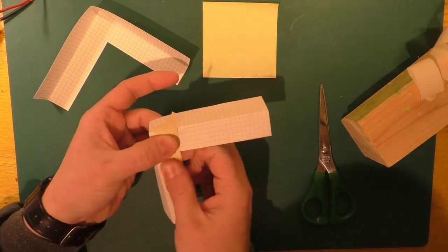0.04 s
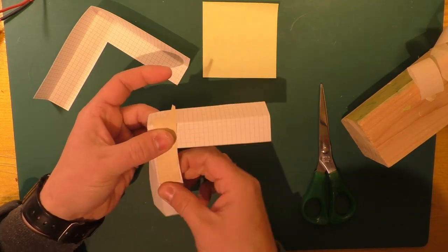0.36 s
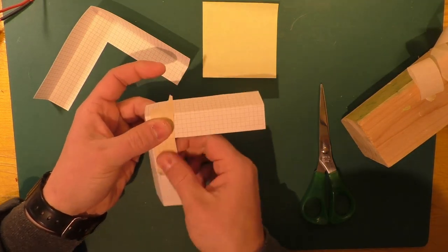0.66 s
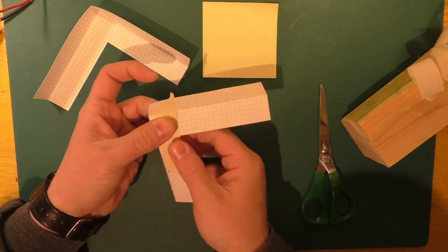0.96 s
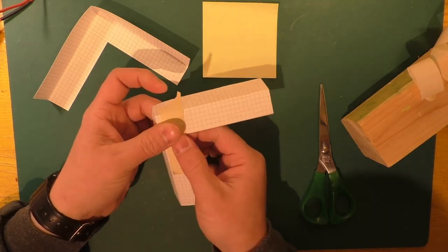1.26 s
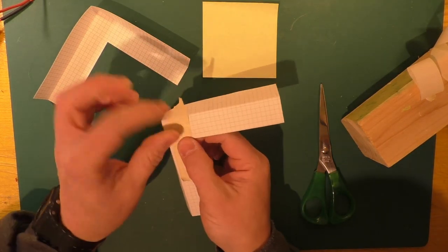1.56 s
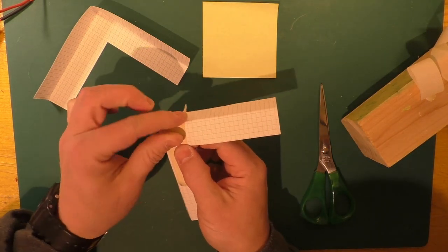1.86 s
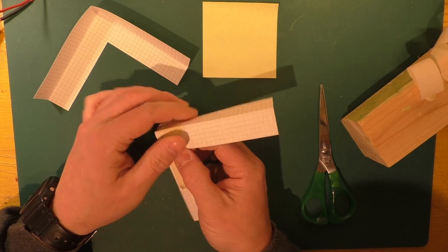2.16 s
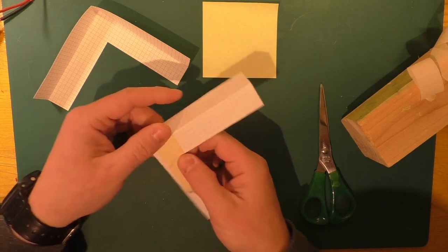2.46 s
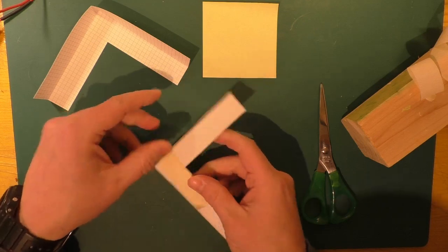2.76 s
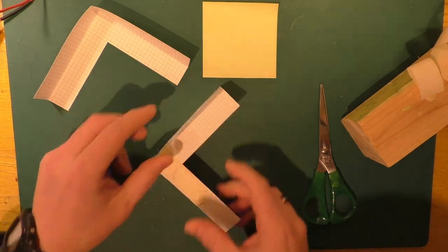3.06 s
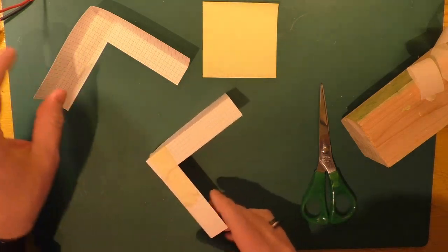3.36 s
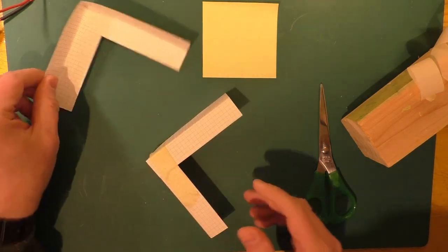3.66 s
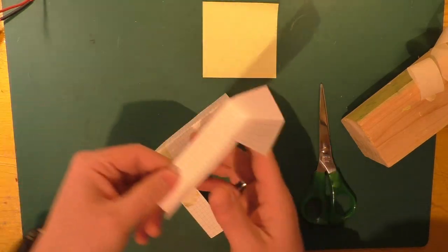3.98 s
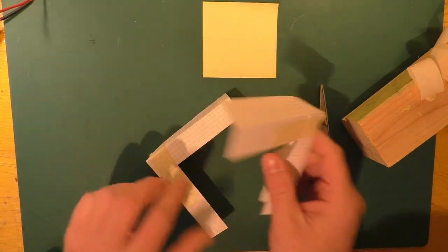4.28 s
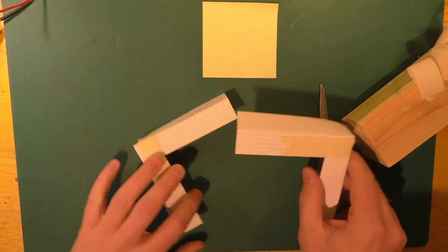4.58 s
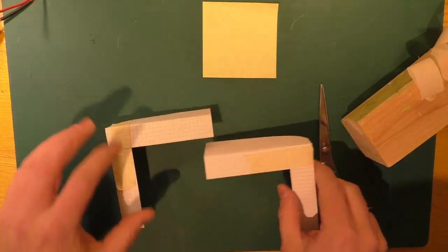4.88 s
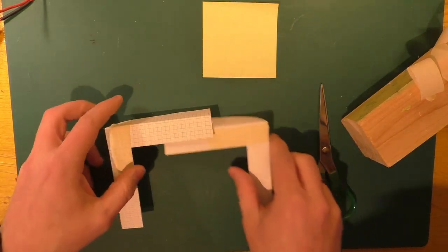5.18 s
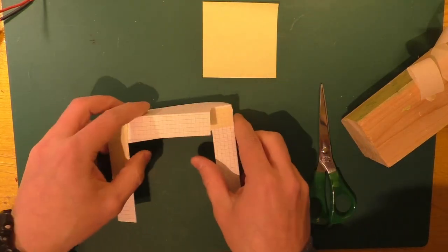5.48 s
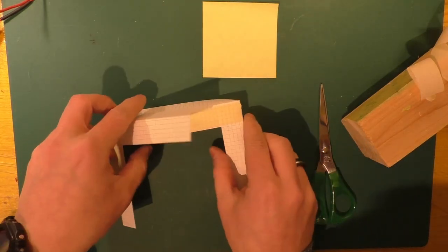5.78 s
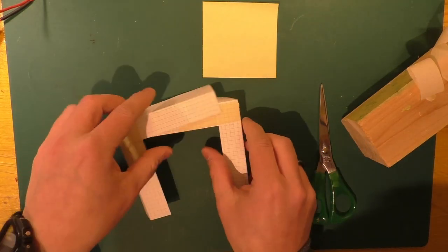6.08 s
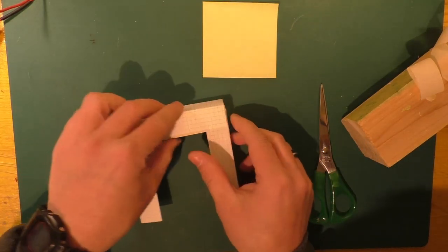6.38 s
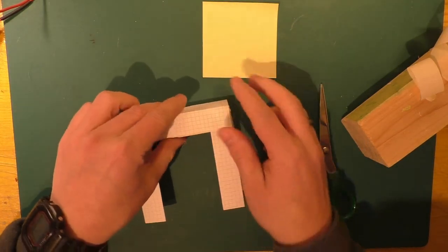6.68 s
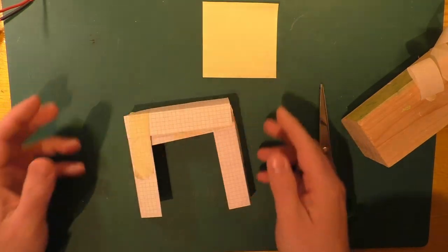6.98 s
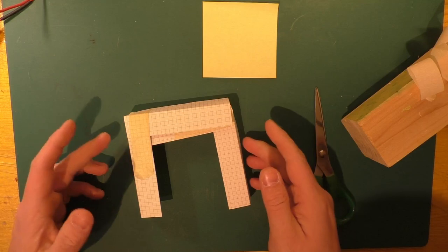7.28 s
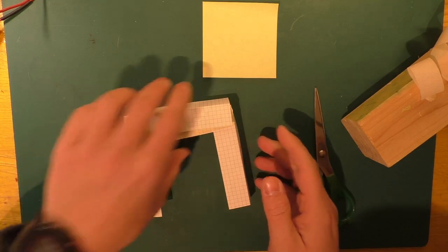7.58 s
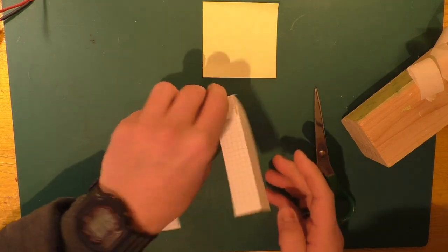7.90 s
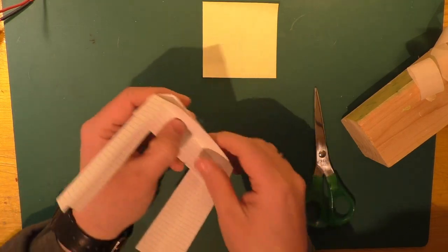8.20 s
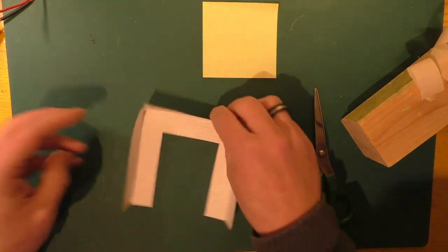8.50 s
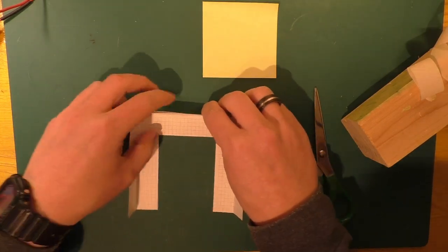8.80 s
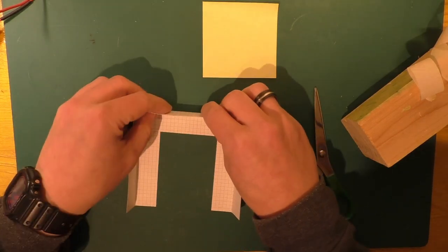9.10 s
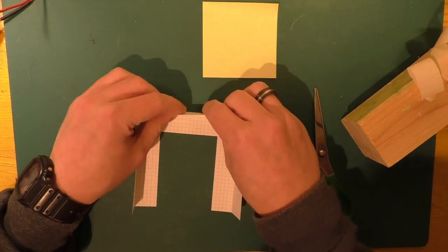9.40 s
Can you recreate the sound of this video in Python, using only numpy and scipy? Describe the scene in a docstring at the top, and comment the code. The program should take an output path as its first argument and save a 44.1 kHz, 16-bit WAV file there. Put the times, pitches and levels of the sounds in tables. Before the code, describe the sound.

Fingers brush and press thick folded paper, with sharp crease pops, scrapes across a mat and a few soft thumps.

```python
"""Folded strips of thick paper are fitted together on a cutting mat in a small, quietly humming room.
First fingertips brush the paper with a fine hiss, and creases pop as it bends. Near 3 s a piece is nudged;
dull, low thumps sound under some of the loudest pops. At 4.4 s cut edges stick and slip over the mat,
making the strips ring. At 5 s one strip slides into another, then their seam is pressed. From 8.3 s
fingers smooth the standing frame, with more pops and soft thumps."""
import sys
import numpy as np
from scipy import signal
from scipy.fft import rfft, irfft
from scipy.io import wavfile
from scipy.ndimage import map_coordinates

SR = 44100
rng = np.random.default_rng(int(sys.argv[2]) if len(sys.argv) > 2 else 0)


def transcribe(u):
    """Save the signal u as a 16-bit wav file named by the first command-line argument.

    u: samples, shape (n,) or (channels, n), limited to [-1, 1]; the rate is SR.
    q: integer samples, one column per channel.
    """
    v = np.clip(np.atleast_2d(u).T, -1, 1)
    q = np.round(v * 32767).astype(np.int16)
    wavfile.write(sys.argv[1], SR, q)


N = 416738

# Hand strokes. Body (low notes) and treble (high notes) are set against the level of the middle range.
# Columns: t/s, speeding up/s, easing off/s, level/dB, body/dB, treble/dB
# Fingertips on the strips, and two faint rustles (1.78 s and 7.59 s) while the hands rest
BRUSHES_AND_RUSTLES = [(0.0, 0.061, 0.17, -43.5, -6.5, 0), (0.235, 0.081, 0.053, -46.5, -20, -1),
                       (0.408, 0.021, 0.028, -45.5, -9, 2), (0.412, 0.12, 0.237, -57.5, -2.5, -4),
                       (0.587, 0.15, 0.13, -45, -12, 1), (0.605, 0.016, 0.02, -49, 5, -16),
                       (0.847, 0.08, 0.31, -58, -10.5, -2), (1.094, 0.03, 0.028, -52.5, -5, -10.5),
                       (1.197, 0.016, 0.095, -54, -7, -6), (1.378, 0.057, 0.016, -35, -3, -4),
                       (1.445, 0.025, 0.093, -46.5, -14, 1), (1.632, 0.13, 0.028, -54, -5.5, -2),
                       (1.78, 0.06, 0.1, -69, -9, -1), (1.934, 0.075, 0.066, -42.5, -4.5, -4),
                       (2.108, 0.14, 0.045, -48.5, -5.5, -2), (2.307, 0.079, 0.27, -47, -6.5, -1),
                       (2.551, 0.035, 0.011, -34.5, -6, -5), (2.626, 0.034, 0.029, -42.5, -13, -2),
                       (3.406, 0.095, 0.094, -53, -8, -2.5), (3.577, 0.019, 0.022, -44.5, -3, 6),
                       (3.64, 0.01, 0.038, -40, -37, 5), (3.685, 0.047, 0.34, -62, -12.5, 0),
                       (4.005, 0.023, 0.1, -57, -3, 2.5), (4.112, 0.076, 0.027, -47.5, -13, 0),
                       (4.226, 0.09, 0.051, -50.5, -20, 1), (7.59, 0.041, 0.029, -65, 7.5, 0)]
NUDGES = [(2.735, 0.028, 0.1, -37.5, -4.5, -8.5), (2.933, 0.035, 0.049, -28, -5.5, -10.5),
          (3.023, 0.106, 0.13, -50.5, -8, -4.5), (3.284, 0.11, 0.025, -34, -4, -13)]  # a piece moved lightly on the mat
DRAGS = [(4.439, 0.02, 0.045, -20.5, -15, -14.5), (4.491, 0.013, 0.097, -24, -11.5, -9.5),
         (4.594, 0.067, 0.12, -19.5, -13.5, -13.5), (4.727, 0.008, 0.046, -34.5, -19, -3)]  # cut edges pulled hard over the mat
PUSHES = [(4.982, 0.083, 0.034, -36, -12, -4.5), (5.093, 0.045, 0.18, -28.0, -9.5, -7.5),
          (5.264, 0.047, 0.168, -25, -21.5, -10), (5.364, 0.083, 0.077, -25.5, -13.5, -10),
          (5.572, 0.019, 0.029, -37, -9.5, -6), (5.616, 0.034, 0.096, -33, -13, -6.5)]  # one strip going into another
PRESSES = [(5.733, 0.044, 0.077, -37, -14.0, -9.5), (5.858, 0.13, 0.14, -37.5, -11, -12),
           (6.12, 0.065, 0.06, -26.5, -9.5, -8), (6.312, 0.049, 0.037, -31, -4.5, -8.5),
           (6.4, 0.027, 0.068, -33.5, -4.5, -9.5), (6.545, 0.022, 0.082, -43.5, -4.5, -5),
           (6.675, 0.012, 0.031, -52, -9, 0), (6.734, 0.038, 0.015, -29, -12.5, -12),
           (6.787, 0.013, 0.16, -53, -7.5, -6), (6.998, 0.12, 0.061, -55, -2.5, -2.5),
           (7.193, 0.0096, 0.041, -50, -3, -11), (7.367, 0.029, 0.025, -58.5, -13, -7),
           (7.797, 0.043, 0.089, -39.5, 0, -9.5), (7.867, 0.11, 0.031, -29, -11, -6.0),
           (8.022, 0.02, 0.186, -53, -12, -4)]  # the seam being squeezed
SMOOTHINGS = [(8.26, 0.012, 0.048, -44.5, -12.5, -4), (8.283, 0.075, 0.082, -49.5, -9, 1),
              (8.377, 0.091, 0.03, -40.5, -4, 3.5), (8.517, 0.032, 0.029, -37, -8, 3.5),
              (8.558, 0.065, 0.23, -50.5, -0.5, -0.5), (8.728, 0.017, 0.058, -31, -1.5, -1),
              (8.849, 0.031, 0.084, -38.5, -7, -1.5), (8.975, 0.012, 0.052, -36.5, -12, 2.5),
              (9.142, 0.033, 0.31, -51.5, -4, -0.5), (9.245, 0.085, 0.055, -48, -7, -2)]  # finger pads on the standing frame
# Tone colours, or how strong each sound is from low to high: f/Hz, level/dB
HUSH_TONE = [(20, 1), (55, 2), (100, 3), (145, 5), (240, 4.5), (340, -1), (450, -4), (620, -14.5), (730, 2),
             (820, -14), (1400, -5.5), (2200, -8), (7000, -26), (12000, -44)]
BRUSH_TONE = [(100, -18), (350, -18), (600, -18), (850, -9.5), (1000, -5), (1400, 3.5), (2000, 0.5),
              (3600, 7), (4800, 1.5), (5800, -8), (8500, -9), (12000, -9), (16000, -21.5)]
POP_TONE = [(100, -24.5), (550, -25), (900, -8.5), (1400, -5), (2300, -2), (3000, -7), (4500, -7),
            (5600, -15), (7000, -18.5), (9000, -13), (12000, -21.5), (16000, -31.5)]
NUDGE_TONE = [(100, -34.5), (350, -24), (640, -23.5), (910, -14.5), (1400, -6.5), (2280, -2.5),
              (3170, -10.5), (4700, -10.5), (5600, -20), (7000, -26.5), (8400, -23), (12600, -29),
              (16000, -41.5)]
DRAG_TONE = [(100, -23), (350, -21), (600, -23), (900, -5), (1500, 0.5), (2000, 3), (2500, 3), (3050, -4.5),
             (4100, -2.5), (4700, -0.5), (5600, -19), (9500, -20), (12000, -23.5), (16000, -41.5)]
PUSH_TONE = [(100, -46), (350, -12.5), (600, -14), (950, -1), (1500, 5), (2300, 2.5), (2900, 2), (3900, -4),
             (4800, -2.5), (5600, -14), (9500, -12.5), (13000, -21.5), (16000, -31)]
PRESS_TONE = [(100, -34), (350, -20.5), (600, -24), (950, -5.5), (1400, -1), (1800, 1), (2300, 2.5),
              (3300, -2.5), (3900, -1.5), (4800, -4.5), (5600, -10.5), (9500, -13), (13000, -17.5),
              (16000, -31.5)]
SMOOTH_TONE = [(100, -21), (350, -19.5), (600, -17), (850, -19), (1100, -10), (1600, -1.5), (2300, 5),
               (3200, 3.5), (4700, 4), (5800, -4), (8500, -4), (12000, -6.5), (16000, -14.5)]
ECHO_TONE = [(150, 3), (500, 7), (1000, 2.5), (2500, -1), (4800, -3), (8000, -6.5), (15000, -6.5)]
# Notes at which the folded strips ring: f/Hz, width/Hz, boost/dB
STRIP_NOTES = [(498.5, 49, 17), (890, 19, -3), (1246, 15, -14), (1250, 110, -4), (1940, 5.9, 7),
               (2227, 74, 4), (2373, 28, 6.5), (2490, 120, 3), (3210, 69, 8.5), (3544, 37.5, 8),
               (3680, 100, -1), (4400, 46, 1), (4645, 50, 9)]
# Creases popping: t/s, level/dB, body/dB, treble/dB, panel f/Hz, crumple share (0-1)
CREASE_POPS = [(0.0593, -50, 5, -8, 2000, 0.6), (0.1585, -41.5, -12, -10, 1900, 0.6),
               (0.8603, -49.5, -13, 4.5, 2240, 0.4), (1.004, -46, -3, -6, 2050, 0.5),
               (1.0638, -47, -1, -9, 1810, 0.86), (1.6548, -54, -1, 3.5, 2090, .9),
               (2.254, -41, -9, -10, 2900, 0.4), (2.4395, -45.5, 6, -8, 2110, 0.7),
               (2.6417, -41, 6, -3, 1720, 0.04), (2.6845, -35, -7.5, -11, 1910, 0.25),
               (2.7348, -21.5, -8, -18.5, 2220, 0.17), (2.7705, -14, -10, -14, 2520, .01),
               (2.8066, -34, -2, -26, 2190, .2), (2.892, -26, -10.5, -32, 2250, 0.5),
               (2.9327, -16, -13.5, -13.5, 2320, 0.27), (2.9738, -23.5, -5, -15, 2140, 1),
               (4.092, -44, -0.5, -9, 2640, 0.4), (4.1375, -47.5, 2, -6, 2340, 0.7),
               (4.194, -40.5, -4, -5, 2390, 0.5), (4.493, -17, -16.5, -10.5, 2000, .45),
               (4.794, -27, -8, -30, 2350, 0.6), (4.8702, -38, 2.5, -13.5, 1660, 0.66),
               (4.991, -42.5, 2.5, -7, 2000, 0.8), (5.0544, -16.5, -15.5, -8, 2030, 0.05),
               (5.5783, -25, -13, -20, 2480, 0.5), (5.5971, -22.5, -13, -15, 1780, 1),
               (5.796, -14.5, -27, -10, 2380, 0.02), (5.9628, -30.5, -14, -17, 2430, 1),
               (6.002, -19.5, -6.5, -19, 2240, .3), (6.075, -38, -1.5, -14, 2120, 0.5),
               (6.245, -26.5, -13, -13.5, 2960, 1), (6.2901, -27, -13.5, -17, 2260, 0.6),
               (6.3108, -19.5, -17, -20, 2170, 0.86), (6.34, -21, -10, -20, 2100, 0.87),
               (6.5604, -22, -22, -22.5, 2340, 0.03), (6.722, -35.5, -10, -20, 2150, 0.6),
               (6.8092, -34, -3.5, -25, 2230, 0.46), (7.192, -40.5, 5, -18, 1680, 0.3),
               (7.8114, -22.5, -10.5, -23, 2370, 0.2), (7.841, -26, -8, -29, 2420, 0.6),
               (8.211, -45.5, -8.5, -10, 2190, 1), (8.2848, -38.5, -14, 2.5, 2210, .1),
               (8.2997, -43, -8, -14, 2120, 0.4), (8.4223, -34, -3, -10, 1700, 0.1),
               (8.5161, -18.5, -8, -9.5, 2046, 0.98), (8.7333, -23, -12.5, -20, 2130, 0.8),
               (9.2681, -44.5, -11, -10, 2260, .5), (9.3174, -40, -10, -4, 1510, 0.62)]
# Dull, low thumps, the first three under some of the loudest paper pops:
# t/s, level/dB, f/Hz, rumble's time to fade by 60 dB/s, rumble share (0-1)
THUMPS = [(2.7706, -38, 330, 0.019, 0.65), (5.0549, -39.5, 274, 0.029, 0.03),
          (5.7965, -36, 221, 0.041, 0.08), (7.191, -44.5, 294, 0.14, 0.9), (8.401, -39, 230, 0.074, 0.87),
          (8.43, -39, 228, 0.11, 0.8), (8.516, -44.5, 217, 0.13, .9), (8.734, -46, 280, .2, .8),
          (8.966, -43, 200, 0.21, 0.7), (8.99, -43, 181, 0.15, 0.7)]
# Runs of an edge catching on the mat: t/s, length/s, level/dB
CHATTERS = [(3.331, .055, -35.5), (4.454, .014, -20.5), (4.7434, .031, -22), (5.949, .012, -33.5)]
# The note of the hollow between the strips, shifting as they slide together: t/s, f/Hz, boost/dB
HOLLOW_NOTE = [(5.1, 2250, 5.5), (5.25, 2460, 3.5), (5.32, 2660, 7), (5.4, 2820, 1), (5.46, 3040, 7),
               (5.52, 2190, 4), (5.7, 2250, 0.5)]
# How long the room echoes: f/Hz, time to fade by 60 dB/s
ECHO_FADE = [(150, 0.1), (800, 0.19), (2200, 0.17), (5500, 0.18), (14000, 0.16)]

FFT_SIZE, FRAME = 4096, 512  # in samples
HZ = np.fft.rfftfreq(FFT_SIZE, 1 / SR)


def amp(db):
    """Turns decibels into a number to multiply by."""
    return 10 ** (np.asarray(db) / 20)


def unit(x):
    """Scales a signal to an average strength (rms) of one."""
    return x / np.sqrt(np.mean(x ** 2) + 1e-20)


def curve(points, hz):
    """Joins (frequency, value) points with straight lines along a scale of octaves."""
    f, value = np.transpose(points)
    return np.interp(np.log(hz + 1), np.log(f), value)


def add(mix, s, sound):
    """Mixes a sound in at s seconds."""
    part = mix[max(round(s * SR), 0):][:len(sound)]
    part += sound[:len(part)]


def peak(centre_hz, width_hz, db, hz=HZ):
    """The boost in dB around one ringing note."""
    return db / (1 + (2 * (hz - centre_hz) / width_hz) ** 2)


def paper_db(tone, ring):
    """A tone colour in dB, with the strips' notes added as strongly as ring says."""
    return curve(tone, HZ) + ring * sum(peak(*note) for note in STRIP_NOTES)


def bands(colour, body_hz=1500, treble_hz=5200):
    """Weights that pick out the middle, body and treble of a tone colour, all equally strong."""
    body = 1 / (1 + (HZ / body_hz) ** 6)
    treble = 1 - 1 / (1 + (HZ / treble_hz) ** 14)
    middle = 1 - body - treble
    return np.array([band / np.sqrt(np.mean((band * colour) ** 2)) for band in (middle, body, treble)])


def tap(colour):
    """The quickest tap that has this tone colour (minimum phase)."""
    log_gain = np.log(np.maximum(colour, colour.max() * 1e-5))
    mirrored = np.concatenate([log_gain, log_gain[-2:0:-1]])
    return np.fft.ifft(np.exp(np.conj(signal.hilbert(mirrored)))).real[:len(HZ)]


def wander(count, per_s):
    """A random line that heads for a new value per_s times a second."""
    points = rng.standard_normal(4000)
    return unit(np.interp(np.arange(count) * per_s / SR, np.arange(len(points)), points))


def patches(shape, rows, columns):
    """Random hills and dips over pitch and time, spaced so many rows and columns apart."""
    points = rng.standard_normal((300, 1200))
    row, column = np.indices(shape)
    return unit(map_coordinates(points, [row / rows, column / columns], order=1, mode="mirror"))


def strokes(rows, t, contact_s=0.0054, slow_db=-12.5):
    """Strength of middle, body and treble at times t: each stroke swells and fades with hand speed."""
    start, rise, fall, level, body, treble = np.transpose(rows)[:, :, None]
    past_top = t - start - rise
    slope_s = np.maximum(np.where(past_top < 0, rise, fall), contact_s)
    swell_db = slow_db * abs(past_top / slope_s) ** 1.304
    contact = np.clip((t - start) / contact_s, 0, 1)
    bands_db = (swell_db, body + 0.91 * swell_db, treble + 1.036 * swell_db)  # faster is brighter
    return np.array([np.linalg.norm(contact * amp(level + band_db), axis=0) for band_db in bands_db])


def rub(rows, tone, db, ring, slips_per_s, slip_share, flutter_db, flex_db,
        sing_hz=0, sing_db=0, hollow=None, firm_db=-36):
    """Rubbing: hissing fibres and tiny separate slips set the paper ringing."""
    first_s = rows[0][0]
    last_s = max(start + rise + 3 * fall for start, rise, fall, *_ in rows)
    t = np.arange(round(first_s * SR), min(round(last_s * SR), N)) / SR
    hop = FRAME // 4
    slipping = rng.random(len(t)) < slips_per_s / SR
    size, fibres = rng.standard_normal((2, len(t)))
    slips = unit(slipping * np.sign(size) * np.minimum(0.29 + abs(size), 1.8))
    force = np.interp(t, t[::hop], strokes(rows, t[::hop])[0])
    grip = force / (force + amp(firm_db))  # a light touch glides, a firm one sticks and slips
    hiss = unit(fibres * amp(flutter_db * grip * wander(len(t), per_s=260)))
    share = slip_share * grip
    friction = np.sqrt(share) * slips + np.sqrt(1 - share) * hiss
    colour = amp(paper_db(tone, ring))
    ringing = signal.oaconvolve(friction, tap(colour))[:len(t)]
    hz, times, grid = signal.stft(ringing, SR, nperseg=FRAME, noverlap=FRAME - hop)  # pitch by time
    hz, times = hz[:, None], times + first_s
    grid *= bands(colour)[:, ::FFT_SIZE // FRAME].T @ strokes(rows, times)
    grid *= unit(amp(flex_db * patches(grid.shape, rows=3.014, columns=11)))  # flexing shifts the tone
    grid *= amp(peak(sing_hz, 520, sing_db * np.interp(times, t, grip), hz))  # a firm grip sings one note
    if hollow is not None:
        when, note_hz, boost_db = np.transpose(hollow)
        note_shape = peak(np.interp(times, when, note_hz), 660, 1, hz) - 0.46
        grid *= amp(np.interp(times, when, boost_db) * note_shape)
    sound = signal.istft(grid, SR, nperseg=FRAME, noverlap=FRAME - hop)[1][:len(t)]
    soft_ends = signal.windows.tukey(len(t), 0.012 * SR / len(t))
    out = np.zeros(N)
    add(out, first_s, amp(db) * sound * soft_ends)
    return out


def room_hush(rumble_db=-56.5, hiss_db=-68, likeness=0.037):
    """A low room rumble, only slightly alike on left and right, and a thin, steady hiss."""
    shared, *sides = rng.standard_normal((3, N))
    noise = np.sqrt(likeness) * shared + np.sqrt(1 - likeness) * np.array(sides)
    colour = amp(curve(HUSH_TONE, np.fft.rfftfreq(N, 1 / SR)))
    rumble = unit(irfft(rfft(noise) * colour, N))
    hiss = unit(np.diff(rng.standard_normal(N + 1)))
    return amp(rumble_db) * rumble + amp(hiss_db) * hiss


def brushes_and_rustles():
    """Skin hisses on paper and a firm pinch rings the glued corner; two faint rustles fall in pauses."""
    return rub(BRUSHES_AND_RUSTLES, BRUSH_TONE, db=-0.98, ring=0.15, slips_per_s=260, slip_share=0.76,
               flutter_db=4, flex_db=1, sing_hz=1950, sing_db=11, firm_db=-34.5)


def snap(level, body, treble, panel_hz, crumple, buckle_fade_s=0.026, crumple_fade_s=0.144):
    """A paper panel buckles with one sharp pop, and smaller crumples follow right after."""
    t = np.arange(len(HZ)) / SR
    panel_db = peak(panel_hz, 400, db=10) + peak(1.73 * panel_hz, 400, db=7)
    colour = amp(paper_db(POP_TONE, ring=0.62) + panel_db)
    pop = tap(colour * (amp([0, body, treble]) @ bands(colour)))
    bending = np.exp(-4j * np.pi * 0.000694 * np.sqrt(1000 * HZ))  # high notes cross the paper fastest
    pop = irfft(rfft(pop, FFT_SIZE) * bending)[:len(t)]
    share = np.sqrt(crumple)
    fade = amp(-60 * t / buckle_fade_s) + share * amp(-12 - 60 * t / crumple_fade_s)
    crackle = rng.standard_normal(len(t)) * fade * (t > 0.0004)
    crumples = signal.fftconvolve(crackle, pop)[:len(t)]
    crumples *= np.linalg.norm(pop) / np.linalg.norm(crumples)
    sound = np.sqrt(1 - share) * pop + np.sqrt(share) * crumples
    return amp(level) * np.sqrt(0.0043 * SR) * sound


def crease_pops():
    """The creases pop as the strips are bent and set down."""
    out = np.zeros(N)
    for s, *crease in CREASE_POPS:
        add(out, s, snap(*crease))
    return out


def crinkles(count=130, spread_db=3.5, spread_octaves=0.46):
    """The paper ticks at random moments under the fingers, louder under a firmer stroke."""
    out = np.zeros(N)
    times = rng.uniform(0, N / SR, count)
    forces = np.minimum(strokes(BRUSHES_AND_RUSTLES + SMOOTHINGS + PRESSES, times)[0], amp(-45))
    for s, force, (size, pitch) in zip(times, forces, rng.standard_normal((count, 2))):
        hz = 2000 * 2 ** (spread_octaves * pitch)
        add(out, s, force * snap(spread_db * size, body=-2, treble=-9, panel_hz=hz, crumple=0.43))
    return out


def mat_nudges():
    """Cut edges scrape lightly as a piece is nudged over the mat."""
    return rub(NUDGES, NUDGE_TONE, db=-1.5, ring=0.4, slips_per_s=180, slip_share=0.63,
               flutter_db=0.5, flex_db=0.8)


def low_thumps(damping=0.82, ring_hz=141, thump_cut_hz=32, rumble_cut_hz=85):
    """Dull, low thumps, most of them under paper pops, each with a short rumble that rings one note."""
    out, t = np.zeros(N), np.arange(SR // 4) / SR
    rumble_colour = HZ ** 2 / (HZ ** 2 + rumble_cut_hz ** 2) * amp(peak(ring_hz, 45, db=7))
    bass_cut = HZ / (HZ + 1j * thump_cut_hz)
    for s, level, hz, fade_s, share in THUMPS:
        colour = abs(bass_cut / (1 - (HZ / hz) ** 2 + 1j * damping * HZ / hz))
        shake = rng.standard_normal(len(t)) * amp(-60 * t / fade_s)
        rumble = signal.fftconvolve(shake, tap(colour * rumble_colour))
        size = amp(level) * np.sqrt(0.0061 * SR)
        add(out, s, size * np.sqrt(1 - share) * tap(unit(colour)))
        add(out, s, size * np.sqrt(share) * rumble / np.linalg.norm(rumble))
    return out


def edge_chatter(gap_s=0.0087, uneven_db=1.5):
    """An edge sticks and lets go at a steady pace, snapping the same panel each time."""
    out = np.zeros(N)
    for start, length, level in CHATTERS:
        for s in np.arange(start, start + length, gap_s):
            catch_db = level + uneven_db * rng.standard_normal()
            add(out, s, snap(catch_db, body=-16, treble=-18, panel_hz=2290, crumple=0.25))
    return out


def edge_drags():
    """Cut edges dragged hard over the mat stick and slip, with a faint, high squeak."""
    return rub(DRAGS, DRAG_TONE, db=-1, ring=0.79, slips_per_s=600, slip_share=0.73,
               flutter_db=-2, flex_db=3.5, sing_hz=8210, sing_db=16)


def strip_pushes():
    """Paper slides inside paper, and the hollow between the strips rings at a shifting pitch."""
    return rub(PUSHES, PUSH_TONE, db=-0.7, ring=0.78, slips_per_s=420, slip_share=0.26,
               flutter_db=2.5, flex_db=3, hollow=HOLLOW_NOTE)


def seam_presses():
    """The seam rubs with a fine grain as the frame is pressed and picked up."""
    return rub(PRESSES, PRESS_TONE, db=-0.7, ring=1, slips_per_s=1100, slip_share=0.34,
               flutter_db=5, flex_db=3)


def frame_smoothing():
    """Soft finger pads glide over the standing frame and damp it, so the hiss stays even."""
    return rub(SMOOTHINGS, SMOOTH_TONE, db=-1.7, ring=0.1, slips_per_s=250, slip_share=0.33,
               flutter_db=2.5, flex_db=1, firm_db=-45)


def room_echo(sound, echo_db=-3.5):
    """The direct sound plus a short echo, different on each side and weaker in the treble."""
    hz, t, grid = signal.stft(rng.standard_normal((2, SR // 2)), SR, nperseg=256)
    fading_db = curve(ECHO_TONE, hz)[:, None] - 60 * t / curve(ECHO_FADE, hz)[:, None]
    echo = signal.istft(grid * amp(fading_db), SR, nperseg=256)[1]
    echo *= np.clip(np.arange(echo.shape[1]) / SR / 0.0012, 0, 1)  # table and hands reflect almost at once
    response = amp(echo_db) * echo / np.sqrt(0.037 * SR)
    response[:, 0] += 1  # the direct sound
    return signal.fftconvolve(sound[None], response, axes=1)[:, :N]


def scene(lean_db=0.4):
    """The room's hush and all the handling sounds, with the hands a little to the left."""
    handling = brushes_and_rustles() + crease_pops() + crinkles() + mat_nudges() + low_thumps()
    handling += edge_chatter() + edge_drags() + strip_pushes() + seam_presses() + frame_smoothing()
    return room_hush() + room_echo(handling) * amp([[lean_db / 2], [-lean_db / 2]])


def record(dry, ceiling=0.85, top_hz=16200):
    """Rounds off the sharpest peaks, then cuts the very highest treble."""
    rounded = dry / (1 + (dry / ceiling) ** 4) ** 0.25
    treble_cut = signal.firwin(511, top_hz, window=("kaiser", 9), fs=SR)
    return signal.oaconvolve(rounded, treble_cut[None], "same")


dry = scene()
out = record(dry)
transcribe(out)
```